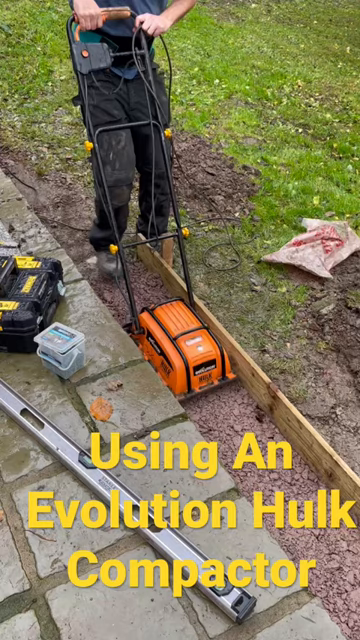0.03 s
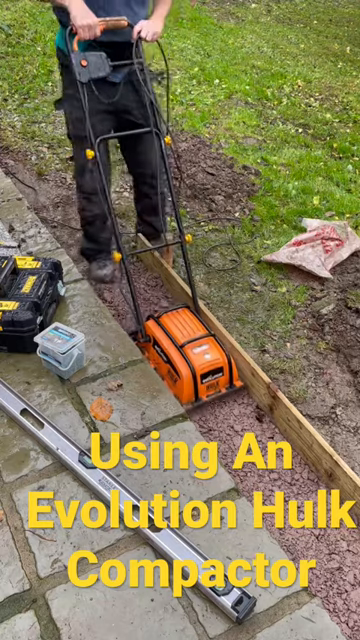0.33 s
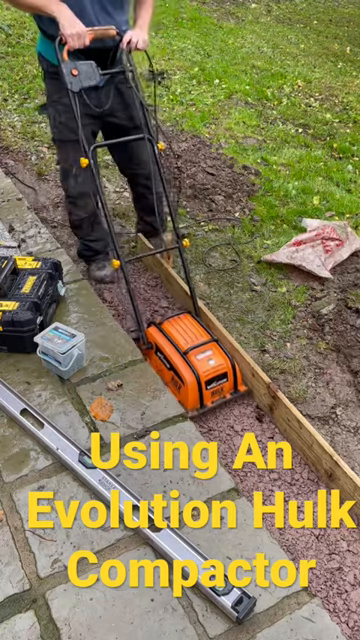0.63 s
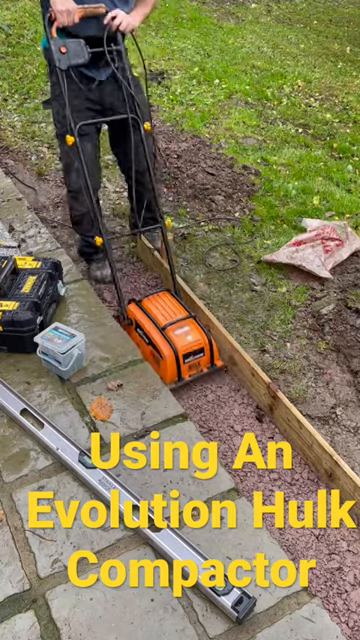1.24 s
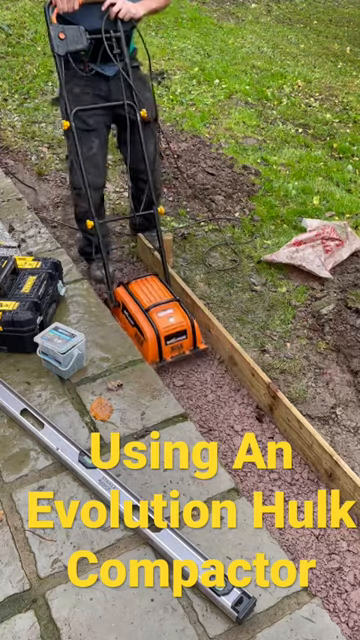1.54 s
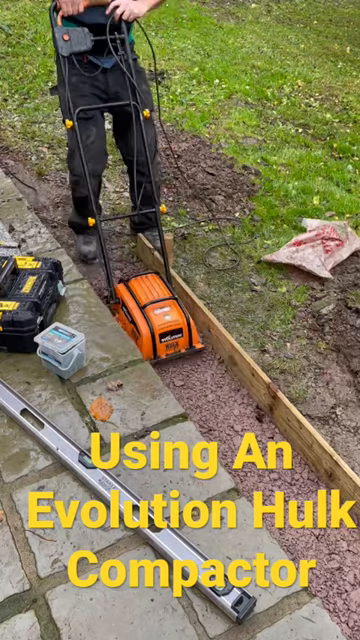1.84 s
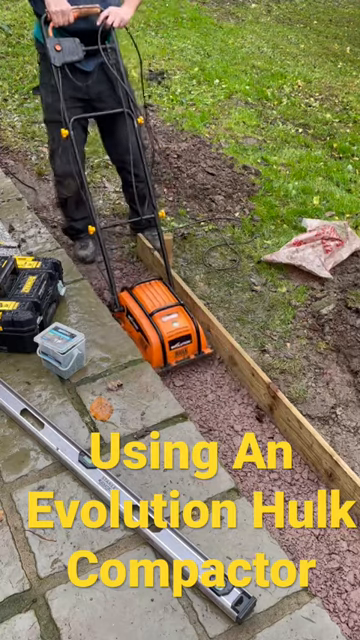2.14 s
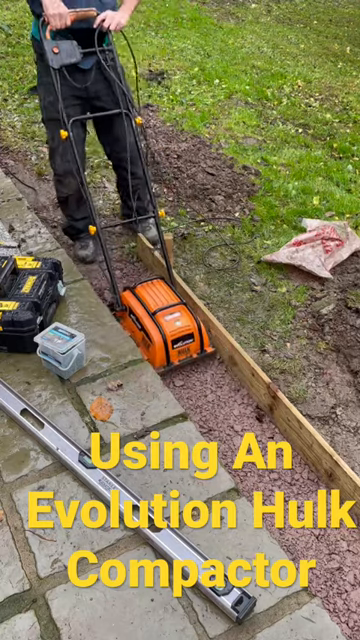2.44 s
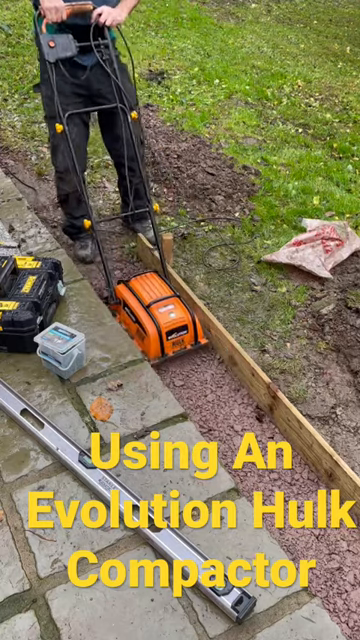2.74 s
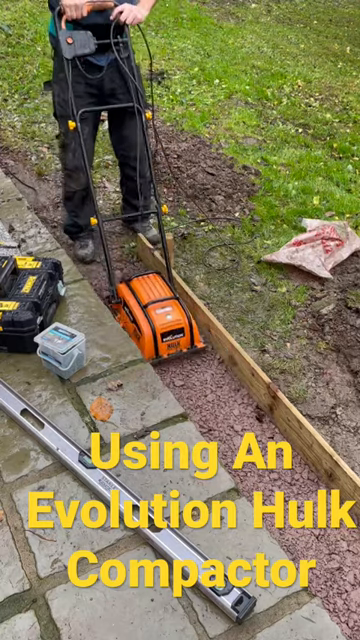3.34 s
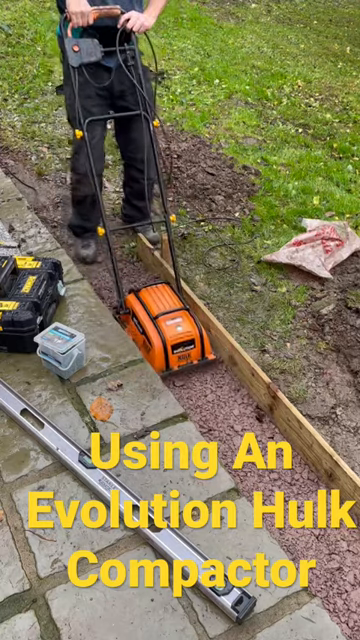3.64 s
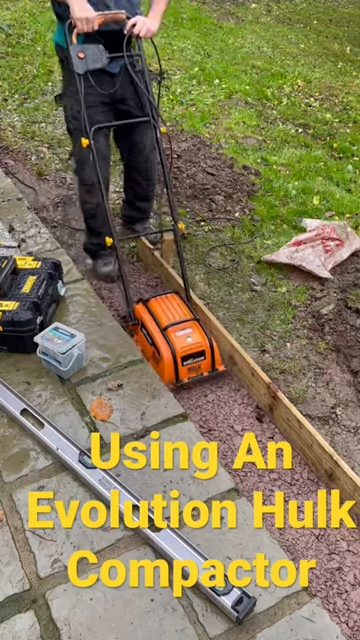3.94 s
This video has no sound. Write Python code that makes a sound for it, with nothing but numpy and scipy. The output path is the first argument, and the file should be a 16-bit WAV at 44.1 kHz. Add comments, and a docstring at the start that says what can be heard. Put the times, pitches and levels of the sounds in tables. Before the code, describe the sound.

A plate compactor drones and clatters over gravel, with hard metallic knocks as it bounces.

```python
"""Plate compactor on gravel

A small plate compactor is pushed over gravel in a garden. Its eccentric weight turns about 49 times a
second and forces plate and cover to drone. Once a turn the plate thumps and clatters on the stones;
twice a turn the drive rattles. The plate bounces and lands hard, more often in the second half.
Early on its edge scrapes along the stones, and one stone makes the steel ping."""
import sys
import numpy as np
from scipy import signal
from scipy.fft import rfft, irfft, next_fast_len
from scipy.io import wavfile
from scipy.ndimage import uniform_filter1d, map_coordinates

SR = 44100
rng = np.random.default_rng(int(sys.argv[2]) if len(sys.argv) > 2 else 0)


def write(x):
    x = np.atleast_2d(x).T
    wavfile.write(sys.argv[1], SR, np.round(np.clip(x, -1, 1) * 32767).astype(np.int16))


N = 176400
TIME = np.arange(N) / SR

def amp(db):
    """Amplitude ratio of a level in decibels."""
    return 10 ** (np.asarray(db) / 20)

def unit(x):
    """Normalisation to an rms of 1."""
    return x / np.sqrt(np.mean(x ** 2) + 1e-20)

def along(points, hz):
    """Interpolation of (Hz, value) points on a logarithmic frequency axis."""
    knots_hz, values = np.transpose(points)
    return np.interp(np.log(hz + 1), np.log(knots_hz + 1), values)

def curve(rows):
    """Linear interpolation of (seconds, value) points at every sample."""
    return np.interp(TIME, *np.transpose(rows))

def wobble(rate):
    """Smooth random modulation: a spline through `rate` Gaussian values a second."""
    return map_coordinates(rng.standard_normal(int(N * rate / SR) + 4), [np.arange(N) * rate / SR])

def filtered(x, response):
    """Linear filtering: the spectrum is multiplied by a frequency response."""
    size = next_fast_len(N + SR // 2)
    return irfft(rfft(x, size) * response(np.fft.rfftfreq(size, 1 / SR)), size)[..., :N]

def coloured(x, spectrum, size=4096):
    """Minimum-phase filtering at unit energy: folding the cepstrum makes the response causal."""
    cepstrum = irfft(np.log(amp(along(spectrum, np.fft.rfftfreq(size, 1 / SR)))))
    cepstrum[1:size // 2] *= 2
    cepstrum[size // 2 + 1:] = 0
    response = irfft(np.exp(rfft(cepstrum)))
    return signal.fftconvolve(x, response / np.linalg.norm(response))[:N]

def impulses(times, sizes):
    """Impulsive excitation: one spike per blow."""
    return np.bincount(np.clip(np.round(times * SR).astype(int), 0, N), sizes, N + 1)[:N]

def each_turn(turns, place, scatter_s, spread_db, limp_db=1.0):
    """Quasi-periodic impacts, `place` of the way through each turn, alternately weak and strong."""
    k = np.arange(int(turns[-1]))
    late, size = rng.standard_normal((len(k), 2)).T
    times = np.interp(k + place, turns, TIME) + scatter_s * late
    return impulses(times, amp(spread_db * np.clip(size, -2, 2) - limp_db * (-1) ** k))

def bursts(blows, attack_s, t60_s, grit_db):
    """Incoherent summation: each blow starts a dying spray of tiny contacts whose powers add."""
    t = np.arange(SR // 8) / SR
    shape = (1 - np.exp(-t / attack_s)) * amp(-60 * t / t60_s)
    grit = unit(rng.standard_normal(N) * amp(grit_db * wobble(1500)))
    power = signal.fftconvolve(blows ** 2, (shape / shape.max()) ** 2)[:N]
    return grit * np.sqrt(np.abs(power))

def ring(blows, modes, vary_db):
    """Modal superposition: damped sinusoids, excited a little differently by every blow."""
    t = np.arange(SR // 4) / SR
    rung = np.zeros(N)
    for k, (hz, db, t60_s) in enumerate(modes):
        mode = (-1) ** k * amp(db - 60 * t / t60_s) * np.sin(2 * np.pi * hz * t)
        rung += signal.fftconvolve(blows * amp(vary_db * wobble(50)), mode)[:N]
    highpass = signal.butter(4, 62, "high", fs=SR, output="sos")
    return signal.sosfilt(highpass, rung) / np.sqrt(len(modes))

# Tones of shaft and drive, and of rocking. Each row: multiple of the turning rate, relative level in dB.
SHAFT_TONES = [(1, -31.5), (20.05, -39.5)]
ROCKING_TONES = [(2, -5), (2.5, -3), (5.5, -10)]
# Envelopes of the rocking throb and the two drones. Each row: time in seconds, level in dB.
ROCKING_LEVEL = [(0, -27), (1.2, -24.5), (1.45, -34), (3.3, -29), (4, -31.5)]
PLATE_DRONE_LEVEL = [(0, -35), (.3, -19.5), (.58, -26.5), (.7, -19), (1.36, -22), (1.45, -37), (2.15, -45),
                     (2.32, -21.5), (2.75, -44), (3.33, -22), (3.5, -51), (4, -38)]
COVER_DRONE_LEVEL = [(0, -19), (.17, -15.5), (.38, -18.5), (.47, -30), (.57, -21.5), (.68, -35),
                     (.87, -18.5), (1.02, -24.5), (1.12, -26), (1.22, -25), (1.44, -28), (1.75, -19),
                     (2.1, -20.5), (2.21, -32.5), (2.34, -21.5), (2.45, -29.5), (2.75, -21), (2.84, -29.5),
                     (3.1, -22), (3.34, -27), (3.55, -23.5), (3.7, -22), (3.87, -15), (4, -27)]

def drone(turns):
    """Forced vibration at multiples of the turning rate; rocking every second turn adds half orders."""
    def tone(order, drift_cycles, rate):
        return np.sqrt(2) * np.sin(2 * np.pi * (order * turns + drift_cycles * wobble(rate)))
    shaft = sum(amp(db) * tone(order, 0.00475 * order, 45) for order, db in SHAFT_TONES)
    throb = amp(curve(ROCKING_LEVEL)) * sum(amp(db) * tone(order, 0.072, 16) for order, db in ROCKING_TONES)
    plate = amp(curve(PLATE_DRONE_LEVEL)) * tone(3, 0.026, 9.5)
    cover = amp(curve(COVER_DRONE_LEVEL)) * tone(5, 0.013, 12)
    return shaft + throb + plate + cover

def steel(x, share=0.2, t60_s=0.035, count=130):
    """Dense resonance: a share of the power passes through the steel plate's short-lived modes."""
    t = np.arange(SR // 10) / SR
    offset, phase = rng.random((count, 2)).T
    hz = 700 + 6000 * (np.arange(count) + offset) / count
    response = np.sin(2 * np.pi * (hz[:, None] * t + phase[:, None])).sum(0) * amp(-60 * t / t60_s)
    rung = unit(signal.fftconvolve(x, response)[:N]) * x.std()
    return np.sqrt(1 - share) * x + np.sqrt(share) * rung

# Spectrum of the clatter. Each row: frequency in Hz, relative level in dB.
CLATTER_SPECTRUM = [(150, -23), (300, 1.5), (600, 0.5), (800, -1.5), (980, 3.5), (1100, 0), (1230, 3.5),
                    (1400, -6.5), (1600, 0), (1800, -4.5), (2200, 0.5), (2750, -11.5), (4150, -8.5),
                    (6000, -18.5), (16000, -32)]
# Its envelope. Each row: time in seconds, relative level in dB.
CLATTER_LEVEL = [(0, -31), (1, -32), (1.7, -28), (2.15, -32), (2.85, -32.5), (3.05, -27), (3.3, -28.5),
                 (4, -30.5)]

def clatter(stones, gain_db=1.5):
    """Contact noise: brief collisions with stones excite the steel over a broad band."""
    return amp(curve(CLATTER_LEVEL) + gain_db) * unit(steel(coloured(stones, CLATTER_SPECTRUM)))

# Modes of the frame. Each row: frequency in Hz, relative level in dB, 60 dB decay time in seconds.
FRAME_MODES = [(316.5, 1.5, 0.085), (400, -4.5, 0.13), (493.5, -1.5, 0.074), (534.4, -2, 0.097),
               (726, -11, 0.12)]
# Its envelope, swelling as the plate bears down. Each row: time in seconds, level in dB.
FRAME_LEVEL = [(0, -29), (.55, -35.5), (.68, -26.5), (.95, -23.5), (1.15, -26), (1.3, -33), (2.25, -30),
               (2.44, -26.5), (2.6, -28), (3.1, -29.5), (3.2, -27), (3.53, -24), (4, -29.5)]

def frame_ring(blows, stones):
    """Structure-borne sound: blows and stone contacts drive the frame's modes with equal power."""
    return amp(curve(FRAME_LEVEL)) * unit(ring(unit(blows) + unit(stones), FRAME_MODES, vary_db=3.0))

# Modes of plate and cover. Each row: frequency in Hz, relative level in dB, 60 dB decay time in seconds.
BODY_MODES = [(73, -3, 0.14), (123, 0, 0.16), (153.6, 4.5, 0.11), (228, 1.5, 0.083), (263.9, 1, 0.17)]
# Envelope of the thumps. Each row: time in seconds, relative level in dB.
THUMP_LEVEL = [(0, -31.5), (.55, -29.5), (.75, -25), (1.2, -30.5), (1.6, -32), (2.42, -28), (4, -28.5)]

def thumps(blows, gain_db=4.5):
    """Free vibration: plate and cover ring in their low modes after each blow on the ground."""
    return amp(curve(THUMP_LEVEL) + gain_db) * unit(ring(blows, BODY_MODES, vary_db=4.5))

# Spectrum of bright metallic impacts. Each row: frequency in Hz, relative level in dB.
METAL_SPECTRUM = [(300, -24.5), (1200, 3.5), (2200, 1), (4500, -4), (5250, 1.5), (6400, 2), (7100, -3.5),
                  (8000, -13.5), (9050, -2), (9270, 8), (9450, -4.5), (11500, -5), (14000, -12.5)]
# Envelope of the rattle. Each row: time in seconds, relative level in dB.
RATTLE_LEVEL = [(0, -38), (.85, -35), (1.42, -40), (2.1, -36), (2.75, -39)]
RATTLE_PLACE = 0.45  # fraction of a turn

def drive_rattle(turns, gain_db=8.5, return_db=-3, return_turns=0.564):
    """Backlash: the play in the drive closes twice a turn, more softly on the return."""
    forth = each_turn(turns, RATTLE_PLACE, scatter_s=0.00086, spread_db=2.5)
    back = each_turn(turns, RATTLE_PLACE + return_turns, scatter_s=0.0015, spread_db=2.5)
    rattle = bursts(forth + amp(return_db) * back, attack_s=0.0017, t60_s=0.042, grit_db=3.0)
    return amp(curve(RATTLE_LEVEL) + gain_db) * unit(coloured(rattle, METAL_SPECTRUM))

# Response of the scattered sound. Each row: frequency in Hz, gain in dB.
SCATTER_GAIN = [(200, -24), (500, -16), (1200, -25), (2500, -9), (5500, -8), (10500, -9), (14500, -15)]

def garden(x, t60_s=0.032, rumble_db=-57):
    """Diffuse scattering from paving and fences, different on each side, over a faint outdoor rumble."""
    t = np.arange(SR // 3) / SR
    tail = rng.standard_normal((2, len(t))) * amp(-60 * t / t60_s)
    echoes = signal.fftconvolve(x[None], tail / np.linalg.norm(tail[0]), axes=1)[:, :N]
    shifting = np.sqrt(2) * np.cos(np.pi * np.array([wobble(40), wobble(40)]))
    rumble = unit(filtered(rng.standard_normal(N), lambda hz: 1 / (1 + (hz / 40) ** 2)))
    return filtered(echoes * shifting, lambda hz: amp(along(SCATTER_GAIN, hz))) + amp(rumble_db) * rumble

# Hard landings after a bounce. Each row: time in seconds, strength in dB.
LANDINGS = [(.238, -15), (0.8963, -15), (1.1244, -13), (1.1859, -12.5), (1.655, -17.5), (1.822, -21),
            (1.8848, -13), (2.171, -14), (2.236, -19.5), (2.3555, -14), (2.381, -14.5), (2.3987, -10.5),
            (2.4594, -11.5), (2.5412, -11.5), (2.6064, -14.5), (2.6267, -13.5), (2.686, -10), (2.7089, -14),
            (2.7878, -15), (2.8704, -10.5), (2.955, -13), (2.9721, -14), (3.137, -19), (3.199, -12),
            (3.2423, -12), (3.2834, -12), (3.3249, -15), (3.363, -16), (3.4077, -11), (3.4481, -11),
            (3.4887, -9), (3.5306, -20), (3.656, -11.5)]
# Spectrum of their clack. Each row: frequency in Hz, relative level in dB.
CLACK_SPECTRUM = [(150, -21), (450, 5.5), (1100, 2.5), (2300, 4.5), (2800, -5), (4100, -2), (6200, -9),
                  (7600, -15), (10000, -17), (16000, -32)]

def landings(clack_db=-6, crack_db=-2, thud_db=-4.5, thud_lag_s=0.00302):
    """Nonlinear impact: clack and thud grow with the blow's strength, the bright crack with its square."""
    times, db = np.transpose(LANDINGS)
    clack = bursts(impulses(times, amp(db + clack_db)), attack_s=0.00052, t60_s=0.049, grit_db=2.5)
    crack = bursts(impulses(times, amp(2 * db + crack_db)), attack_s=0.00022, t60_s=0.026, grit_db=2.5)
    thud = impulses(times + thud_lag_s, amp(db + thud_db))
    strike = steel(coloured(clack, CLACK_SPECTRUM)) + coloured(crack, METAL_SPECTRUM)
    return strike + ring(thud, FRAME_MODES, vary_db=2.5) + 0.5 * ring(thud, BODY_MODES, vary_db=4.5)

# Depth of the dip while the plate is airborne. Each row: time in seconds, attenuation in dB.
FLIGHT_DIP = [(1.7, 1), (2.15, 1.5), (3.45, 3), (3.7, 4)]

def ground_contact(flight_s=0.038):
    """Loss of contact: a gain that dips while the plate flies towards each landing."""
    until_landing = np.transpose(LANDINGS)[0][:, None] - TIME
    flying = ((until_landing > 0) & (until_landing < flight_s)).any(0)
    return amp(-curve(FLIGHT_DIP) * uniform_filter1d(flying.astype(float), size=160))

# Envelope of the scrape. Each row: time in seconds, level in dB.
SCRAPE_LEVEL = [(.4, -62), (.7, -38), (1.05, -42), (1.4, -60)]
# Its slightly sinking pitch. Each row: time in seconds, centre frequency in Hz.
SCRAPE_PITCH = [(.6, 5280), (1.1, 5100)]

def scrape(turns, width_hz=410):
    """Friction: the plate's edge grinds on the stones in narrow-band noise that swells twice a turn."""
    phase = 2 * np.pi * np.cumsum(curve(SCRAPE_PITCH)) / SR
    band = wobble(width_hz) * np.sin(phase) + wobble(width_hz) * np.cos(phase)
    swell = 1 + 0.5 * np.cos(2 * np.pi * 2 * (turns - RATTLE_PLACE))
    return amp(curve(SCRAPE_LEVEL)) * unit(band * swell)

# A stone snapping against the steel. Each row: start in seconds, frequency in Hz, initial level in dB.
PINGS = [(0.588, 5550, -17)]

def stone_ping(t60_s=0.034, roughness=0.6):
    """Damped oscillation: one high mode of the struck steel, roughened by amplitude modulation."""
    rung = np.zeros(N)
    for start_s, hz, db in PINGS:
        age = np.maximum(TIME - start_s, 0)
        rung += amp(db - 60 * age / t60_s) * np.sin(2 * np.pi * hz * age)
    return rung * (1 + roughness * wobble(750))

# Phase difference between the sides. Each row: frequency in Hz, lead of the left in radians.
LEFT_LEAD = [(250, -.04), (550, -.15), (900, 0), (1950, 0), (2800, .7), (4400, .75), (4900, -.1),
             (5400, .25), (7100, 2.9), (8200, 3.25), (10200, 6.2), (11600, 6.3), (13500, 9.1)]
# Level difference between the sides. Each row: frequency in Hz, left minus right in dB.
LEFT_BALANCE = [(50, -.3), (500, -1.1), (1500, -.3), (4400, -2.3), (5100, 2), (6200, 0)]

def stereo_response(hz):
    """Directional cues: level and phase differences, split evenly between left and right."""
    sides = np.array([[0.5], [-0.5]])
    return amp(sides * along(LEFT_BALANCE, hz)) * np.exp(1j * sides * along(LEFT_LEAD, hz))

# Speed of the eccentric weight. Each row: time in seconds, turns per second.
TURNING_RATE = [(0, 48.95), (.45, 48.3), (.85, 48.75), (1.5, 48.55), (2.6, 48.72), (3.05, 48.45),
                (4, 48.55)]

def scene():
    """Superposition: one shaft times drone and repeating blows; the garden scatters the contact noise."""
    turns = np.cumsum(curve(TURNING_RATE)) / SR
    contact = ground_contact()
    blows = contact * each_turn(turns, place=0.74, scatter_s=0.001436, spread_db=1.5)
    stone_hits = each_turn(turns, place=0.543, scatter_s=0.0013, spread_db=0.94, limp_db=-0.5)
    stones = bursts(stone_hits, attack_s=0.0019, t60_s=0.08, grit_db=1)
    noise = contact * clatter(stones) + frame_ring(blows, contact * stones) + thumps(blows)
    noise += landings() + stone_ping() + scrape(turns)
    noise += np.sqrt(contact) * drive_rattle(turns)
    return filtered(noise + drone(turns), stereo_response) + garden(noise)

def record(dry, start_s=0.0357, rise_s=0.0015, top_hz=15800):
    """Gating and band limiting: an abrupt onset, then an ideal low-pass filter."""
    onset = np.clip((TIME - start_s) / rise_s, 0, 1)
    return filtered(dry * onset, lambda hz: hz < top_hz)

dry = scene()
out = record(dry)
write(out)
```